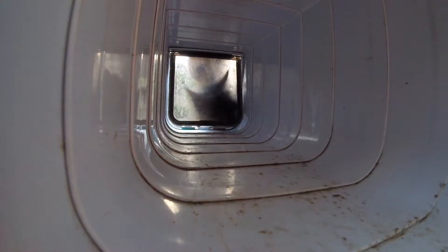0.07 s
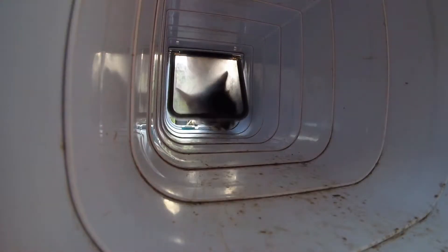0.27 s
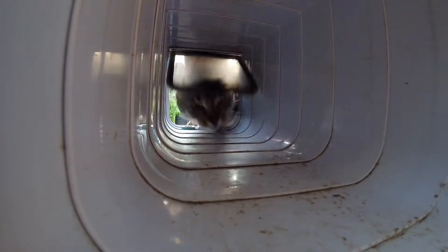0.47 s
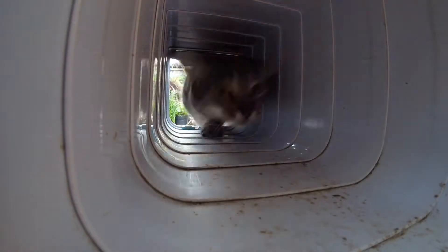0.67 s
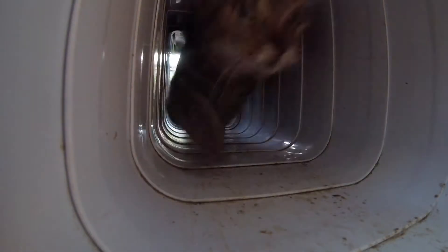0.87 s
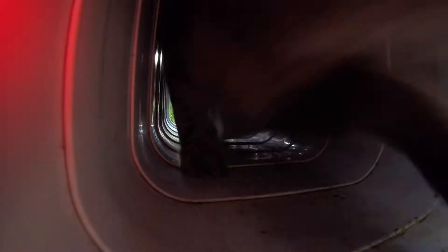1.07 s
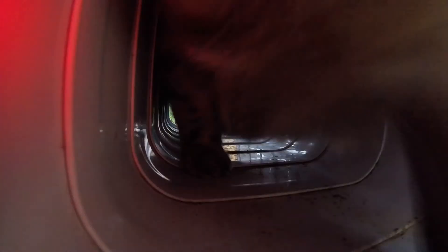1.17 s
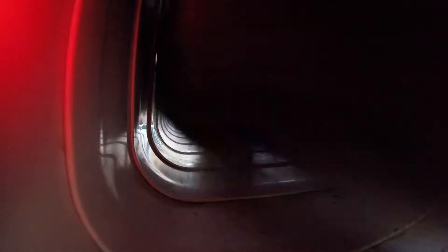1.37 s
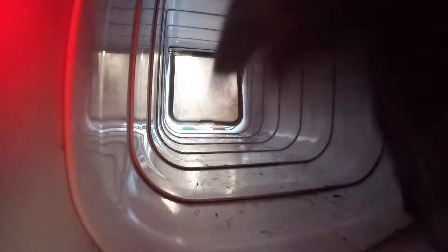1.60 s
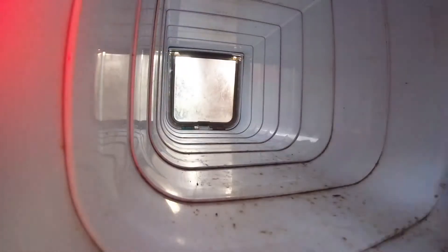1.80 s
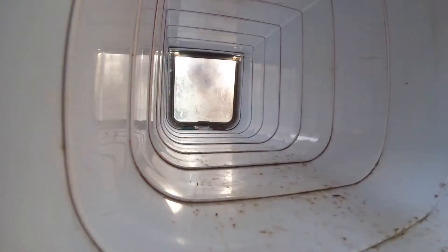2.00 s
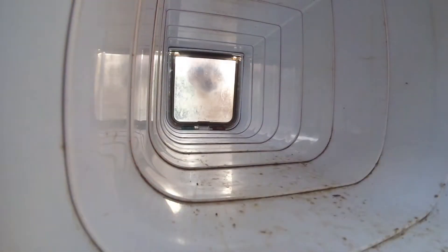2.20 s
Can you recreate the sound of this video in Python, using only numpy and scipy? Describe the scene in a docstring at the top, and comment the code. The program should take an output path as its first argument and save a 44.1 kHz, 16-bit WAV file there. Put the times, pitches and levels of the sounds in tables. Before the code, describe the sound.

Hollow plastic knocking and clicking as a cat pushes through a swinging flap and trots past

```python
"""Cat in a plastic tunnel

Place: a tunnel of nested plastic tubs. A cat pushes in through a plastic flap and trots past one microphone.
Each knock of flap or paw is a click, a brief chatter of loose plastic, a wall ring and a thud that sets
the hollow tunnel booming. Claws, hinge and joints tick between the steps, as contacts without a thud.
Fur and pads scuff as dense random grains; filtered noise makes the quiet room rumble far behind.
Distance is carried by the listed levels alone; the mono pickup cuts the top steeply."""
import sys
import numpy as np
from scipy import signal
from scipy.fft import rfft, irfft, next_fast_len
from scipy.io import wavfile

SR = 44100
rng = np.random.default_rng(int(sys.argv[2]) if len(sys.argv) > 2 else 0)


def generate_wav(sig):
    """Save sig (samples, or channels by samples) to the path in sys.argv[1] as 16-bit PCM at SR."""
    pcm = np.round(np.clip(np.atleast_2d(sig).T, -1, 1) * 32767).astype(np.int16)
    wavfile.write(sys.argv[1], SR, pcm)


N = 99225
T = np.arange(N) / SR  # time [s]

# All levels in the tables are relative; the trims below place each layer in the mix.
# Knocks of flap and paws: (time [s], thud level [dB], thud pitch [Hz], thud t60 [s], ring pitch [Hz],
# ring level [dB], clack level [dB], snap level [dB], chatter length [s])
KNOCKS = [ (0.009, -44, 145, 0.089, 534, -39, -50, -52, 0.0081),
          (0.2137, -38.5, 246.5, 0.21, 586, -26.5, -25.5, -29, 0.0078),
          (0.2533, -28, 305, 0.087, 376, -36, -33, -30.5, 0.0026),
          (0.411, -25.5, 202, 0.091, 1491, -25.5, -31.5, -28.5, 0.013),
          (0.4997, -40.5, 281.3, 0.21, 3536, -30, -33, -27, 0.0023),
          (0.5595, -33, 225, .13, 1318, -41, -39, -28, 0.01),
          (0.7164, -29.5, 191, 0.079, 3450, -30.5, -32.5, -26.5, 0.0082),
          (0.8711, -31.5, 221, 0.07, 2137, -45, -41.5, -32.5, 0.017),
          (0.947, -53.5, 236, 0.24, 1878, -41, -40, -39, 0.0086),
          (1.032, -41.5, 224, 0.075, 2115, -32.5, -38.5, -31.5, 0.0061),
          (1.183, -36.5, 224, 0.23, 1313, -39.5, -35.5, -34.5, 0.011),
          (1.252, -38.5, 260.3, 0.25, 700, -41.5, -44, -41.5, 0.022),
          (1.314, -33, 203, 0.04, 2077, -40, -41.5, -36.5, 0.014),
          (1.3900, -41.5, 176, .2, 624, -46, -51.5, -48, .008),
          (1.4534, -33.5, 312, 0.037, 2147, -38, -38.5, -32, 0.0053),
          (1.5267, -44, 287.7, .2, 995, -34.5, -36, -36.5, 0.0041),
          (1.546, -47, 283, .2, 660, -37, -41, -39, 0.0054),
          (1.5944, -37.5, 204, 0.19, 1340, -40.5, -37.5, -33, 0.0054),
          (1.7302, -37, 221, 0.13, 1512, -33, -36, -33, 0.0077),
          (1.8105, -29.5, 188, 0.061, 602, -31, -31, -32, 0.0043),
          (1.9675, -30.5, 311, 0.092, 1313, -33, -31, -31, 0.005),
          (1.988, -38, 251, 0.15, 413, -35, -49.5, -46, 0.027)]
# Light ticks of claws, hinge and joints: (time [s], clack level [dB], snap level [dB], chatter length [s])
TICKS = [ (0.061, -54, -66, 0.0031), (0.0866, -56.5, -50.5, 0.0034), (0.1815, -44, -46, 0.0047),
         (0.201, -49, -46, 0.0052), (0.263, -34, -37.5, 0.0086), (0.3184, -44.5, -43, 0.02),
         (0.3596, -42, -39, .011), (0.377, -41.5, -47, 0.016), (0.4003, -32, -28.5, 0.001),
         (0.4816, -71, -40, .005), (0.555, -45, -62, .003), (0.588, -42.5, -37.5, 0.0019),
         (0.602, -64, -43, 0.0018), (0.649, -41.5, -54, .003), (0.6539, -38, -28.5, 0.0022),
         (0.672, -41, -38, 0.0097), (0.709, -34, -23, 0.0016), (0.7606, -47, -39.5, .002),
         (0.811, -49, -46.5, 0.017), (0.8323, -40.5, -40.5, 0.0068), (0.8629, -33, -36.5, 0.004),
         (0.937, -44, -41.5, 0.0032), (0.967, -43, -48.5, 0.02), (1.049, -39.5, -34.5, 0.0032),
         (1.064, -52, -40.5, 0.0084), (1.122, -44.5, -39.5, 0.0055), (1.1343, -41, -36, .004),
         (1.147, -41.5, -35.5, 0.0053), (1.17, -45.5, -39, 0.0071), (1.2204, -73, -42, .016),
         (1.281, -41, -39.5, 0.0066), (1.41, -47.5, -51, .008), (1.4438, -41, -38.5, 0.0038),
         (1.476, -50, -38, 0.017), (1.3838, -46.5, -38.5, 0.0094), (1.611, -40, -37, 0.0068),
         (1.625, -54, -39.5, 0.0035), (1.655, -58, -42.5, 0.0097), (1.6856, -46, -41.5, 0.0089),
         (1.7466, -43, -34.5, 0.0069), (1.762, -41, -38.5, 0.0029), (1.8324, -38.5, -38, 0.0052),
         (1.846, -44.5, -33.5, 0.0058), (1.859, -42.5, -34, 0.0045), (1.8895, -46, -41, .006),
         (1.932, -41, -39, 0.0069), (1.942, -51, -45, 0.004), (1.952, -34.5, -37.5, 0.0017),
         (2.0173, -51, -37, 0.0027), (2.1101, -44.5, -53, 0.0031), (2.165, -54, -58, 0.0024),
         (2.178, -46.5, -57, 0.0029)]
# Colour of the dull part of a contact: (frequency [Hz], level [dB])
CLACK_COLOUR = [(200, -12), (380, -7.5), (600, -0.5), (800, 0.5), (1100, 1), (1900, -5), (2500, 0),
                (3500, -26.5), (8000, -61)]
# Colour of the sharp part of a contact: (frequency [Hz], level [dB])
SNAP_COLOUR = [(700, -49), (1800, -10.5), (2600, -0.5), (4000, 0.5), (5200, 2.5), (6600, 1), (7800, -4.5),
               (11400, -7.5), (12200, -17.5), (14000, -58)]
# Colour of the hollow low end of every contact: (frequency [Hz], level [dB])
HOLLOW_COLOUR = [(100, -22), (170, -3), (240, 2.5), (330, 1), (410, -5), (490, -17.5), (900, -40.5)]
# Resonances of the plastic walls: (frequency [Hz], width [Hz], lift [dB])
WALL_RESONANCES = [(563, 51, 10.5), (636, 34, 3.5), (1090, 43, 0.5), (1335, 21, 10), (1506, 80, 6),
                   (1795, 180, 6.5), (2135, 52, 9), (3535, 520, 7.5), (3890, 226, 2), (5940, 800, 2.5),
                   (6473, 340, 9)]
# Air modes of the tunnel: (frequency [Hz], level against the thud [dB], t60 [s])
TUNNEL_MODES = [(122.3, -22.5, 0.81), (167.8, -9.5, 0.35), (210.4, -15, 0.48), (234.7, -8, 0.29),
                (274, -18, 0.38), (316.1, -10, 0.22), (347, -11, 0.067)]
# Fur and pads scuffing along the walls: (time [s], level [dB])
SCUFF_LEVEL = [(0, -62.5), (.16, -61), (.3, -49), (.63, -72), (.9, -49.5), (1.1, -62.5), (1.24, -51.5),
               (1.5, -53), (1.78, -58.5), (1.92, -58), (2.07, -71), (2.25, -90)]
# Colour of the room background: (frequency [Hz], level per Hz [dB])
ROOM_COLOUR = [(15, -16), (28, -0.5), (50, -2), (78, 4.5), (105, -0.5), (150, -9), (380, -24.5), (800, -23),
               (3000, -31), (6500, -27.5), (14000, -41)]

# Contacts: click height against the chatter, then the loose plastic
CLICK_SIZE, CHATTER_PER_S, CHATTER_SPREAD_DB = 3.7, 6000, 3.5
CHATTER_RISE_S, CHATTER_FADE_DB_PER_S = 0.00075, 239
CHATTER_T60_S = 0.038  # extra decay once the chatter length is over
# Level trims
SNAP_DB, THUD_DB, RING_DB, HOLLOW_DB, TICK_HOLLOW_DB = 0.5, 1.5, 1, -4.5, -3.5
# Reflections in the tunnel: level against the direct sound, and decay
CLACK_TAIL_DB, CLACK_TAIL_T60_S = -7, 0.11
SNAP_TAIL_DB, SNAP_TAIL_T60_S = -8, 0.19
HOLLOW_TAIL_DB, HOLLOW_TAIL_T60_S = 0, 0.25
# Colour change from contact to contact: how far and how fast
PATCH_DB, PATCHES_PER_S = 2.5, 36
# Thud, its random spread of mode strengths, and wall ring
THUD_RISE_S, MODE_SPREAD_DB = 0.0071, 2
RING_RISE_S, RING_T60_S = 0.0017, 0.046
# Scuffing, with its share in the dull part
SCUFF_PER_S, SCUFF_SPREAD_DB, SCUFF_CLACK_DB = 2500, 7.5, -6.5
# Room level, and top cut at the microphone
ROOM_DB, CUTOFF_HZ = -55.5, 14100


def clatter():
    """Knocks, ticks and scuffing sound in the plastic walls as a dull clack and a sharp snap."""
    rows = [(s, clack, snap, length) for s, *_, clack, snap, length in KNOCKS] + list(TICKS)
    scuff = scuffing()
    dull = contacts([(s, clack, length) for s, clack, _, length in rows])
    dull += from_db(SCUFF_CLACK_DB) * scuff
    sharp = contacts([(s, snap + SNAP_DB, length) for s, _, snap, length in rows])
    sharp += scuff
    clack = coloured(dull, CLACK_COLOUR, WALL_RESONANCES)
    snap = coloured(sharp, SNAP_COLOUR, WALL_RESONANCES)
    clack = echoing(clack, CLACK_TAIL_DB, CLACK_TAIL_T60_S)
    snap = echoing(snap, SNAP_TAIL_DB, SNAP_TAIL_T60_S)
    return patchy(clack + snap) / np.sqrt(2)


def contacts(rows):
    """Force of (time, level, length) contacts: a click, then chatter that sets in, fades and dies."""
    clicks, power = np.zeros(N), np.zeros(N)
    t = T[:SR // 10]
    for s, db, length in rows:
        add(clicks, s, from_db([db]) * CLICK_SIZE)  # a single sample
        overtime = np.maximum(t - length, 0)
        fade = from_db(db - CHATTER_FADE_DB_PER_S * t - 60 * overtime / CHATTER_T60_S)
        rise = 1 - np.exp(-t / CHATTER_RISE_S)
        add(power, s, (fade * rise) ** 2)
    return clicks + np.sqrt(power) * grains(CHATTER_PER_S, CHATTER_SPREAD_DB)


def patchy(x):
    """Contacts land in different places, so every third-octave band swells and fades by itself."""
    hz = np.arange(N // 2 + 1) * SR / N
    third = 3 * np.log2(np.maximum(hz, 400) / 400)  # the lowest band takes all below 400 Hz
    spectrum, out = rfft(x), np.zeros(N)
    draws = np.clip(rng.standard_normal((18, 400)), -2.5, 1.8)
    for k, draw in enumerate(draws):
        band = irfft(spectrum * np.maximum(1 - abs(third - k), 0), N)
        step = T * PATCHES_PER_S + k / 2  # neighbouring bands turn half a step apart
        out += band * from_db(PATCH_DB * np.interp(step, np.arange(len(draw)), draw))
    return rms_one(out) * np.std(x)


def boom():
    """Each knock flexes a wall panel at its own pitch and excites the air modes of the tunnel."""
    out = np.zeros(N)
    rise = 1 - np.exp(-T / THUD_RISE_S)
    modes = []
    for k, (hz, db, t60) in enumerate(TUNNEL_MODES):
        sign = (-1) ** k
        modes.append(sign * from_db(db) * np.sin(2 * np.pi * hz * T) * dying(t60))
    modes = np.array(modes)
    strengths = from_db(MODE_SPREAD_DB * rng.standard_normal((len(KNOCKS), len(TUNNEL_MODES))))
    for (s, db, hz, t60, *_), strength in zip(KNOCKS, strengths):
        panel = np.sqrt(2) * np.sin(2 * np.pi * hz * T) * dying(t60)
        air = strength @ modes
        add(out, s, from_db(db + THUD_DB) * rise * (panel + air))
    return out


def rings():
    """Depending on where it lands, each knock brings out one brief wall mode, a decaying sine."""
    out = np.zeros(N)
    envelope = (1 - np.exp(-T / RING_RISE_S)) * dying(RING_T60_S)
    for s, _, _, _, hz, db, *_ in KNOCKS:
        add(out, s, from_db(db + RING_DB) * envelope * np.sin(2 * np.pi * hz * T))
    return out


def hollow():
    """The low end of every contact rolls round the tunnel as dense reflections."""
    knocks = [(s, clack, length) for s, *_, clack, _, length in KNOCKS]
    ticks = [(s, clack + TICK_HOLLOW_DB, length) for s, clack, _, length in TICKS]
    low = coloured(contacts(knocks + ticks), HOLLOW_COLOUR)
    return from_db(HOLLOW_DB) * echoing(low, HOLLOW_TAIL_DB, HOLLOW_TAIL_T60_S)


def scuffing():
    """Fur and pads rub along the walls: dense tiny contacts under a slow level curve."""
    level = np.interp(T, *np.transpose(SCUFF_LEVEL))
    return from_db(level) * grains(SCUFF_PER_S, SCUFF_SPREAD_DB)


def room_rumble():
    """Steady noise with the colour of the room."""
    return from_db(ROOM_DB) * coloured(rng.standard_normal(N), ROOM_COLOUR)


def grains(per_s, spread_db):
    """Tiny contacts of uneven size and either sign at random moments; rms 1."""
    sizes = from_db(spread_db * np.minimum(rng.exponential(1, N), 4))
    signs = rng.choice([-1, 1], N)
    return rms_one(sizes * signs * (rng.random(N) < per_s / SR))


def echoing(x, tail_db, t60):
    """A sound with its dense reflections inside the tunnel: a decaying noise tail."""
    tail = rng.standard_normal(N) * dying(t60)
    tail /= np.linalg.norm(tail)
    return x + from_db(tail_db) * signal.fftconvolve(x, tail)[:N]


def coloured(x, points, resonances=()):
    """Causal minimum-phase filter of unit power gain, from a spectrum and resonance peaks."""
    size = next_fast_len(N) * 2
    hz = np.arange(size // 2 + 1) * SR / size + 1e-3
    at, level = np.transpose(points)
    gain = from_db(np.interp(np.log(hz), np.log(at), level))
    for centre, width, db in resonances:
        detune = 2 * (hz - centre) / width
        gain = gain * np.sqrt(1 + (from_db(db) ** 2 - 1) / (1 + detune ** 2))
    # folding the cepstrum forward in time makes the filter causal
    cepstrum = irfft(np.log(rms_one(gain)))
    cepstrum[1:size // 2] *= 2
    cepstrum[size // 2 + 1:] = 0
    return irfft(rfft(x, size) * np.exp(rfft(cepstrum)))[:N]


def dying(t60):
    """Exponential decay from time zero, 60 dB per t60, held once 300 dB down."""
    return from_db(-60 * np.minimum(T / t60, 5))


def add(out, s, sound):
    """Mix a sound in at a time [s]."""
    i = int(max(s, 0) * SR)
    out[i:i + len(sound)] += sound[:N - i]


def rms_one(x):
    """Scale to rms 1."""
    return x / np.sqrt(np.mean(x ** 2) + 1e-20)


def from_db(db):
    """Decibels to gain."""
    return 10 ** (np.asarray(db) / 20)


def scene():
    """Clatter, wall rings, hollow low end and boom over a quiet room rumble, in mono."""
    room = room_rumble()
    cat = clatter() + rings() + hollow() + boom()
    return (cat + room)[None]


def record(dry):
    """The microphone signal: a steep elliptic low-pass cuts the top."""
    top_cut = signal.ellip(10, .1, 80, CUTOFF_HZ, fs=SR, output="sos")
    return signal.sosfilt(top_cut, dry)


dry = scene()
out = record(dry)
generate_wav(out)
```